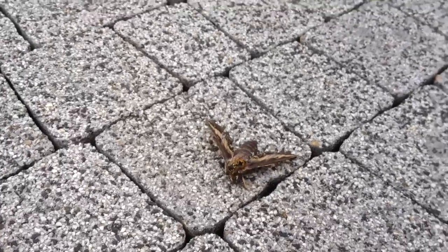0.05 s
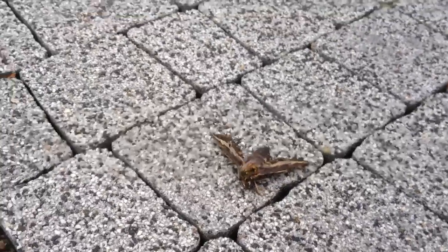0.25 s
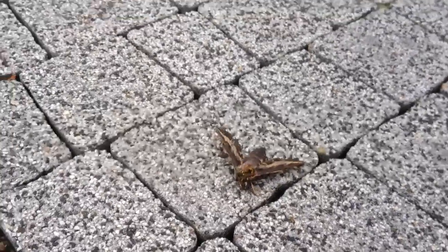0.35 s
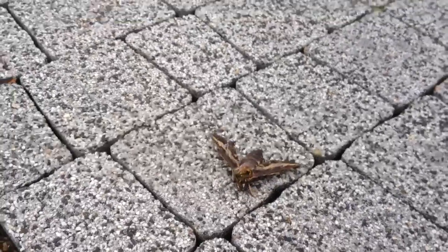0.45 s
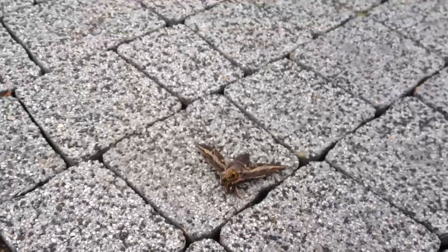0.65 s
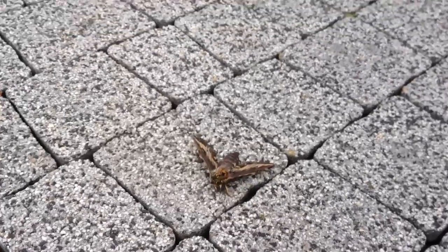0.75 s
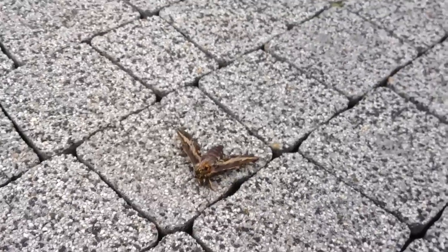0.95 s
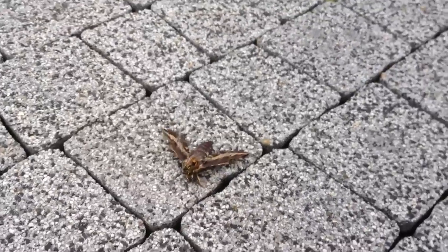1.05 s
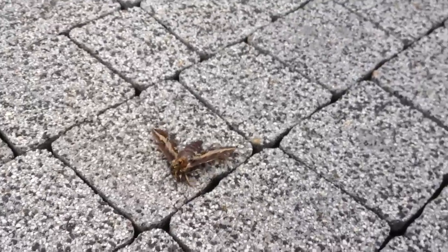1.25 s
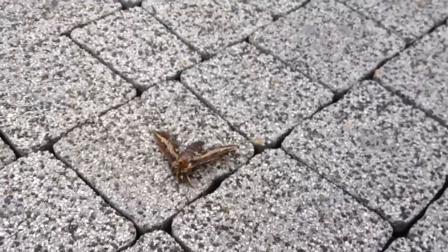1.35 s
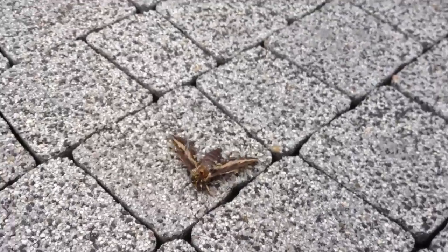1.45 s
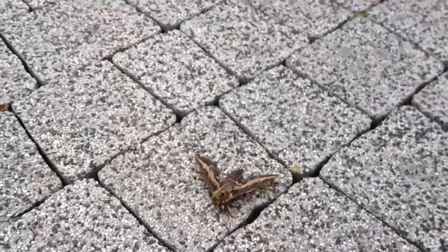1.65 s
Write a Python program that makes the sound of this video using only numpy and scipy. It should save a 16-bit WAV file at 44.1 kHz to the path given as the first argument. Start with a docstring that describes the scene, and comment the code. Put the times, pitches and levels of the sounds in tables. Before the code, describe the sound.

A hand shifts its grip right at the microphone, outdoors on a quiet day. A brief scrape snaps into a sharp knock, followed by soft, uneven rubbing and bumps, then light crackly rustling and clicks over faint hiss.

```python
"""Outdoors over paving on a quiet day, heard from the microphone of a small hand-held camera.
The hand shifts its grip. A catch scrapes and snaps with one sharp knock; fingers then drag on the
housing in dull stick-slip thumps, and end in a dry rustle with small clicks that ring the case.
A faint outdoor hiss lies beneath."""
import sys
import numpy as np
from scipy import signal
from scipy.fft import rfft, irfft
from scipy.io import wavfile

SR = 44100
rng = np.random.default_rng(int(sys.argv[2]) if len(sys.argv) > 2 else 0)


def bounce(signal):
    """Save signal as a 16-bit WAV file at the path given by the first command-line argument."""
    frames = np.transpose(np.atleast_2d(signal))
    limited = np.clip(frames, -1, 1)
    pcm = np.round(limited * 32767).astype(np.int16)
    wavfile.write(sys.argv[1], SR, pcm)


N = 74970
T = np.arange(N) / SR
HZ = np.maximum(np.fft.rfftfreq(2 * N, 1 / SR), 1)


def undb(db):
    """Decibels to gain."""
    return 10 ** (np.asarray(db) / 20)


def unit(x):
    """Scale to rms 1."""
    return x / np.sqrt(np.mean(x ** 2))


def curve(rows):
    """Gain over time from (time [s], level [dB]) rows."""
    return undb(np.interp(T, *np.array(rows).T))


def colour(points):
    """Causal frequency response through (frequency [Hz], level [dB]) points."""
    hz, db = np.array(points).T
    gain = undb(np.interp(np.log(HZ), np.log(hz), db))
    cepstrum = irfft(np.log(gain))
    cepstrum[1:N] *= 2  # fold onto positive time: minimum phase
    cepstrum[N + 1:] = 0
    return np.exp(rfft(cepstrum))


def through(x, response):
    """Filter a signal by a frequency response."""
    return irfft(rfft(x, 2 * N) * response)[:N]


def burst(start, decay_s):
    """Noise of unit energy that starts at once and dies away."""
    noise = rng.standard_normal(N) * (T >= start) * np.exp(-np.abs(T - start) / decay_s)
    return noise / np.sqrt(np.sum(noise ** 2) + 1e-18)


def grains(per_s, spread_db):
    """Random tiny slips, most weak and a few strong."""
    slips = rng.random(N) < per_s / SR
    size = np.minimum(rng.exponential(size=N), 4)
    return slips * undb(spread_db * size) * rng.choice([-1, 1], N)


# Colour of the open air around the microphone (frequency [Hz], level [dB])
AIR_COLOUR = [(30, -28), (90, -11.5), (200, 0.5), (400, -1.5), (620, -6), (900, -10.5), (1600, -11),
              (2600, -17), (5000, -19.5), (8000, -20), (10000, -27.5), (13000, -20), (15500, -25)]

def air(level_db=-67):
    """Faint steady outdoor hiss."""
    return undb(level_db) * unit(through(rng.standard_normal(N), colour(AIR_COLOUR)))


# Resonances of the case that holds the microphone (frequency [Hz], width [Hz], level [dB])
CASE_MODES = [(302, 90, -5.5), (775, 121, -0.5), (1234, 223, -4), (1546, 240, -0.5), (1955, 445, -9),
              (2962, 237, -9), (4194, 294, -15.5), (7590, 290, -16.5)]

def case():
    """Frequency response of the case: damped resonances of alternating sign."""
    return sum((-1) ** k * undb(db) / (1 + 1j * (HZ - hz * hz / HZ) / width)
               for k, (hz, width, db) in enumerate(CASE_MODES))


# Dry rustle of fingers close to the microphone (time [s], level [dB])
RUSTLE_LEVEL = [(.8, -76), (1.0, -66), (1.09, -66), (1.125, -56.5), (1.15, -61.5), (1.21, -59.5),
                (1.27, -57.5), (1.32, -58.5), (1.35, -61), (1.38, -57), (1.42, -66.5), (1.45, -55),
                (1.49, -71.5), (1.52, -68), (1.57, -68.5), (1.63, -70.5), (1.7, -67.5)]
# Its scratchy top (frequency [Hz], level [dB])
SCRATCH_COLOUR = [(300, -32), (1000, 1), (1900, -1.5), (2600, -9.5), (3600, -6), (4800, 2), (5600, -1),
                  (7500, 0.5), (9800, -7.5), (13000, -8), (15000, -3)]

def rustle(scratch_db=-11.5):
    """Dense dry slips scratch and ring the case."""
    response = case() + undb(scratch_db) * colour(SCRATCH_COLOUR)
    return curve(RUSTLE_LEVEL) * unit(through(grains(per_s=3500, spread_db=3), response))


# Handling rumble, right on the housing (time [s], level [dB])
RUB_LEVEL = [(.0, -75), (.41, -71.5), (.44, -52), (.50, -54.5), (.53, -56.5), (.60, -53), (.66, -53.5),
             (.695, -66), (.75, -48), (.78, -43), (.84, -40), (.89, -43), (.93, -43), (.965, -45.5),
             (.99, -61), (1.03, -51.5), (1.085, -44.5), (1.11, -59.5), (1.25, -53), (1.28, -70),
             (1.31, -57.5), (1.42, -57), (1.48, -62.5), (1.63, -62.5), (1.7, -71)]
# Its colour at the microphone (frequency [Hz], level [dB])
RUMBLE_COLOUR = [(25, -43.5), (45, -47), (70, -11.5), (100, -4.5), (130, -3), (172, 0.5), (225, -8),
                 (300, -15), (400, -19), (550, -37), (1000, -43), (3000, -75.5)]

def rub():
    """Skin dragging on the housing makes a low, uneven rumble."""
    slips = grains(per_s=900, spread_db=1.5)
    return curve(RUB_LEVEL) * unit(through(slips, colour(RUMBLE_COLOUR)))


# Slides of the catch, close up (start [s], length [s], level [dB])
CATCH_SLIDES = [(0.022, 0.023, -68.5), (.226, 0.021, -58), (0.241, 0.0053, -57.5)]
# Bright grit shared by scrapes, clicks and knock (frequency [Hz], level [dB])
GRIT_COLOUR = [(300, -18.5), (1000, -10), (2000, -10.5), (2600, -11.5), (3500, -7.5), (4000, -12.5),
               (4700, -2.5), (5600, -8), (6500, -7.5), (8000, -7.5), (9500, -16), (12000, -15.5),
               (15000, -25.5)]

def scrape():
    """The catch makes brief gritty slides that swell and fade; the last leads into the knock."""
    envelope = np.zeros(N)
    for start, length, db in CATCH_SLIDES:
        progress = np.clip((T - start) / length, 0, 1)
        envelope += undb(db) * np.sqrt(np.abs(np.sin(np.pi * progress)))
    return envelope * unit(through(rng.standard_normal(N), colour(GRIT_COLOUR)))


# Small clicks on the case, beside the microphone (time [s], ring level [dB], crack level [dB])
CASE_CLICKS = [(0.1758, -19, -28.5), (.2220, -7, -27), (0.223, -10, -18), (0.2274, -28, -24),
               (0.355, -24, -31.5), (0.362, -25.5, -30.5), (0.5717, -25.5, -49), (0.7597, -35, -54),
               (1.0548, -24.5, -41), (1.0672, -18, -22), (1.1125, -20, -32), (1.1184, -22, -24.5),
               (1.1656, -7, -20), (1.1740, -14.5, -23.5), (1.2101, -18.5, -47), (1.2167, -12.5, -19.5),
               (1.2222, -13.5, -36), (1.2469, -12, -21.5), (1.2915, -18.5, -25), (1.299, -33, -22),
               (1.3149, -12, -41), (1.3190, -13.5, -34), (1.3240, -16.5, -22), (1.3305, -24, -26.5),
               (1.3710, -12.5, -21.5), (1.4040, -15, -22), (1.4272, -20, -32), (1.4362, -0.5, -9.5),
               (1.4420, -8, -44), (1.452, -19, -35), (1.4729, -7, -17), (1.4872, -22, -27.5),
               (1.5030, -34, -18.5), (1.5330, -31, -24.5), (1.5851, -21, -33), (1.5953, -18, -29),
               (1.6194, -19, -18), (1.6329, -24, -35), (1.6506, -22, -28), (1.6765, -35, -28.5)]

def clicks(tail_db=-2):
    """Each click is a short crack with a chattering tail, and rings the case."""
    ring, crack = np.zeros(N), np.zeros(N)
    for start, ring_db, crack_db in CASE_CLICKS:
        tail = undb(tail_db) * burst(start, decay_s=0.0037)
        ring += undb(ring_db) * tail
        ring[int(start * SR)] += undb(ring_db)
        crack += undb(crack_db) * (burst(start, decay_s=0.0024) + tail)
    return through(ring, case()) + through(crack, colour(GRIT_COLOUR))


# Finger thumps and taps, heard through the housing (start [s], peak [dB], pitch [Hz], rise [s])
FINGER_SLIPS = [(.091, -55, 580, 0.0026), (0.174, -46, 243, 0.0027), (0.2221, -40.5, 288, 0.0037),
                (0.225, -40, 507, 0.0037), (0.361, -46.5, 176.4, 0.0055), (0.433, -44.5, 150, 0.0045),
                (.450, -41.5, 172, .005), (0.492, -44, 275, 0.0041), (0.546, -50, 212, 0.0063),
                (0.5728, -49, 1230, .0012), (0.575, -35.5, 174, 0.004), (.596, -41, 245, 0.0037),
                (.649, -43, 168, 0.0043), (0.72, -41.5, 162, 0.0045), (0.7583, -35, 320, 0.0021),
                (.7590, -48.5, 650, 0.00088), (.763, -35.5, 163, 0.007), (.815, -26.5, 154.6, 0.0068),
                (.833, -31.5, 230, 0.0029), (0.863, -34.5, 170, 0.01), (.907, -31.5, 155, 0.0037),
                (0.95, -30, 179.6, 0.0085), (1.021, -33.5, 169, 0.0092), (1.058, -39.5, 181, 0.0045),
                (1.119, -41.5, 192, 0.0024), (1.215, -42, 850, 0.0017), (1.227, -39, 137, 0.0056),
                (1.305, -51, 141, 0.0089), (1.3235, -46.5, 824, 0.0025), (1.372, -43, 157, 0.0035),
                (1.4356, -34, 240, 0.0025), (1.4362, -40, 766, 0.0046), (1.633, -49, 910, 0.0028)]

def thumps():
    """Each slip of a finger gives the housing a few damped swings; a slow slip also dies slowly."""
    out = np.zeros(N)
    for start, db, hz, rise in FINGER_SLIPS:
        age = np.maximum(T - start, 0)
        swell = (age / rise * np.exp(1 - age / rise)) ** 2
        out += undb(db) * swell * np.sin(2 * np.pi * hz * age)
    return out


# Colour of the catch's knock at the microphone (frequency [Hz], level [dB])
KNOCK_COLOUR = [(60, -58), (170, -10.5), (290, -17), (420, -4), (580, 0.5), (800, -1), (1120, -9.5),
                (1400, -3.5), (1620, -6.5), (1920, -19.5), (2280, -12), (2850, -23), (3900, -14.5),
                (4400, -18.5), (4930, -12.5), (5430, -31.5), (6200, -16), (6900, -23.5), (8100, -16),
                (9400, -42), (12000, -50), (14000, -33), (16000, -47)]

def knock(start=0.2456, gain_db=12.5, after_ring_db=-32, grit_db=-10):
    """The catch's snap crosses the housing as a bending wave: treble arrives first, the lows last."""
    lag_s = 0.002294  # travel time at 1 kHz
    phase_cycles = HZ * start + 2 * lag_s * np.sqrt(HZ * 1000)
    bending_wave = irfft(np.exp(-2j * np.pi * phase_cycles))[:N]
    lowpass = 2 / (1 + 1j * HZ / 900)
    after_ring = through(burst(start + lag_s, decay_s=0.0047), lowpass)
    snap = bending_wave + undb(after_ring_db) * after_ring
    grit = through(burst(start + lag_s / 2, decay_s=0.0018), colour(GRIT_COLOUR))
    return undb(gain_db) * through(snap, colour(KNOCK_COLOUR)) + undb(grit_db) * grit


def scene():
    """Close handling sounds over the outdoor hiss, in mono."""
    return (knock() + scrape() + clicks() + thumps() + rub() + rustle() + air())[None]


def record(dry):
    """The camera's microphone thins the deep bass and cuts the top."""
    low_cut = signal.butter(2, 65, "high", fs=SR, output="sos")
    high_cut = signal.ellip(8, .2, 70, 15600, fs=SR, output="sos")
    return signal.sosfilt(high_cut, signal.sosfilt(low_cut, dry))


dry = scene()
out = record(dry)
bounce(out)
```